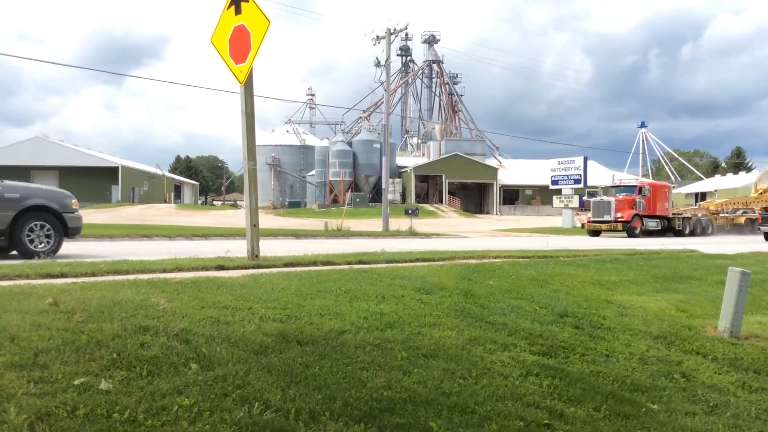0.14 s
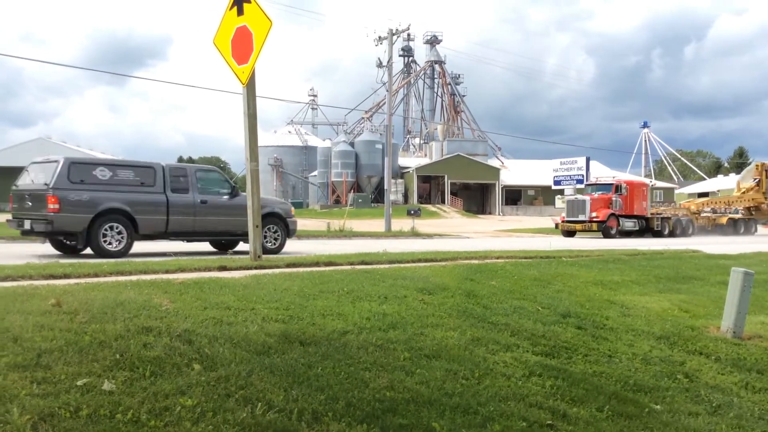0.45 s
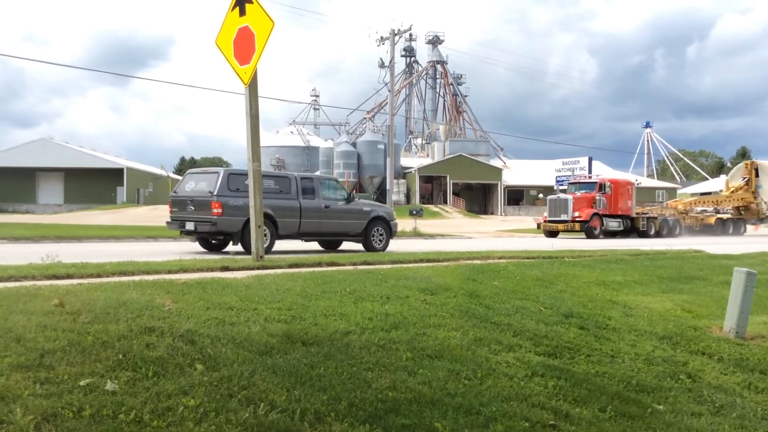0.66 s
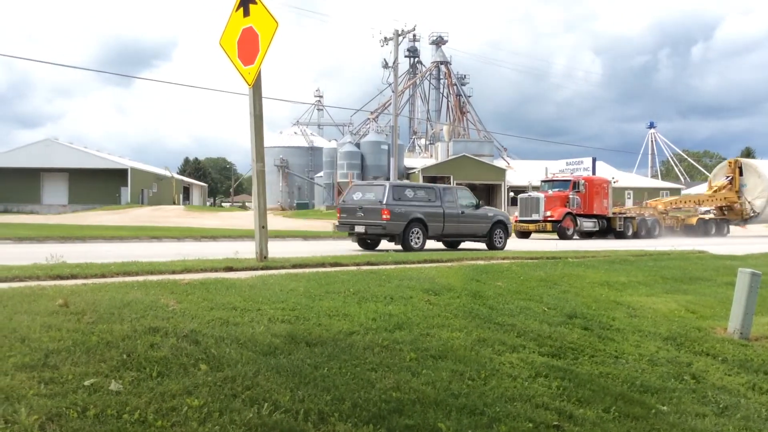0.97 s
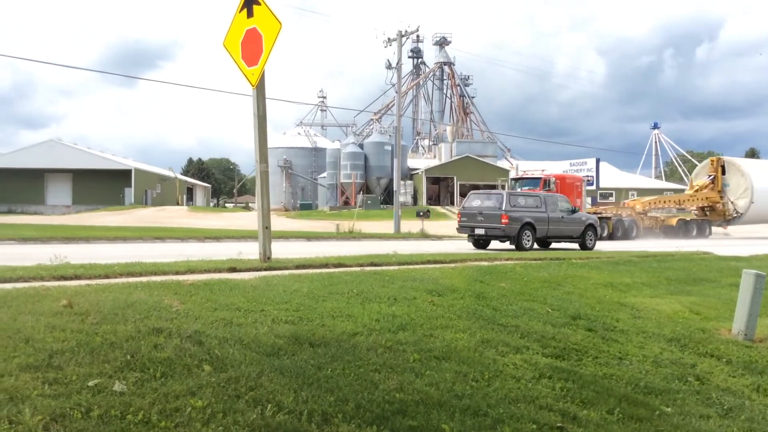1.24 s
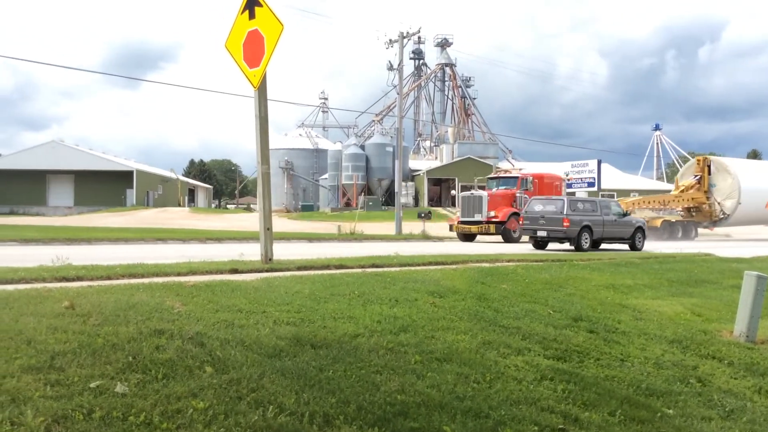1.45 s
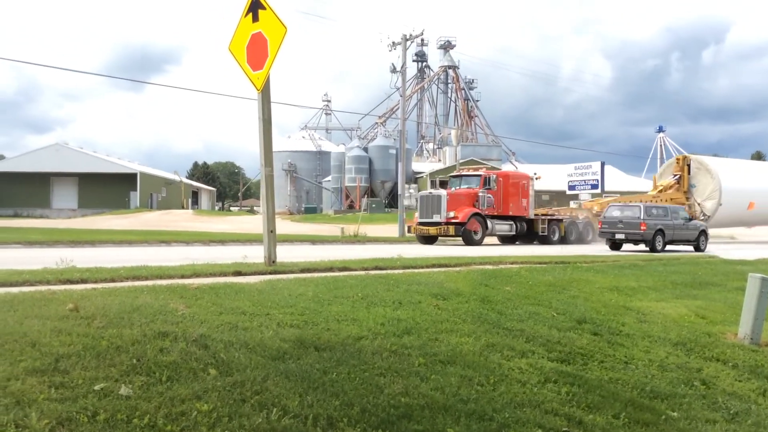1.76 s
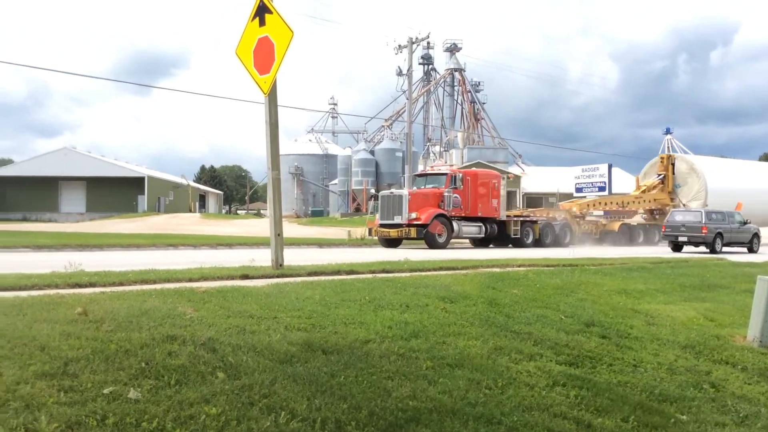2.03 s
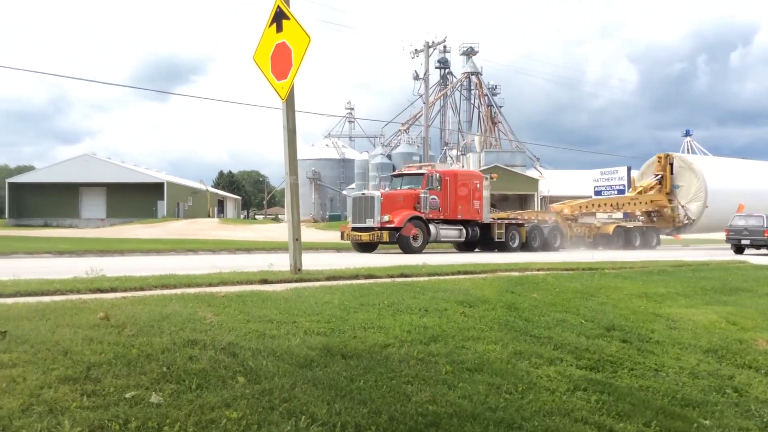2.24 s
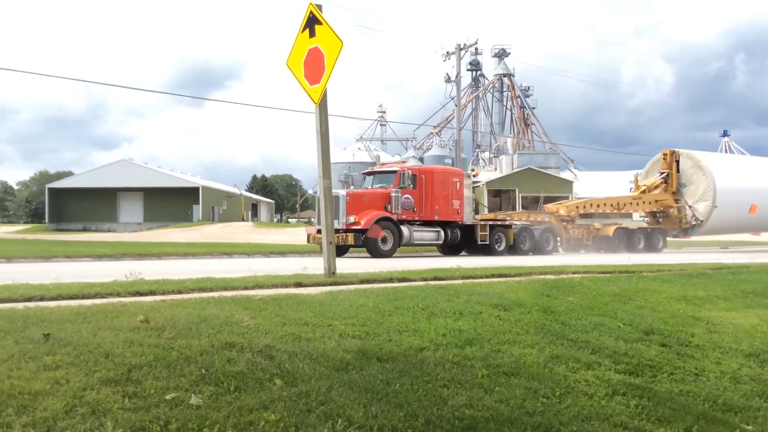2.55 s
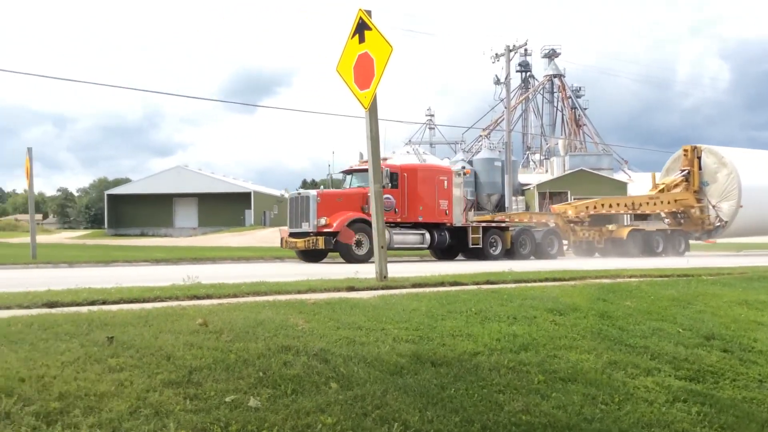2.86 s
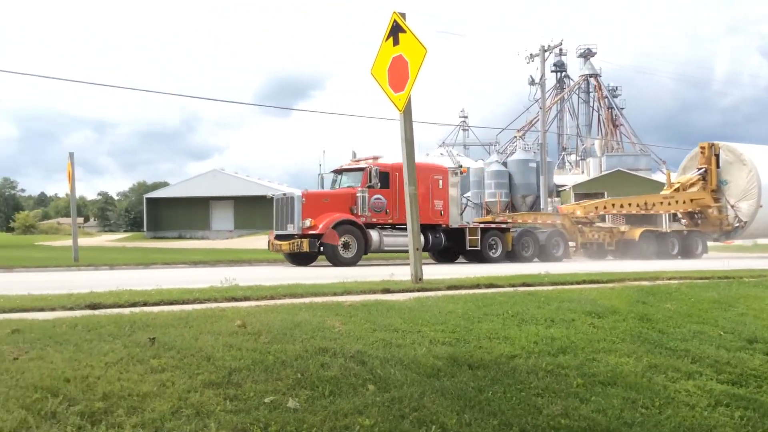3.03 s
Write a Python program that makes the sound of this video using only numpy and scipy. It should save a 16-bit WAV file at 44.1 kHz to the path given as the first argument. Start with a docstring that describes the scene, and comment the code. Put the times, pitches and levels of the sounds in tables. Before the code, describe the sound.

A heavy diesel truck approaches on an open road, its roar, low drone and hiss building under a climbing turbo whistle; a pickup whooshes past first, close by, while wind buffets the outdoor microphone.

```python
"""A pickup goes by at the start: noise for its tyres and rumble, and a hum that drops in pitch.
A heavy diesel truck comes closer: its roar, growl and hiss, made of coloured noise, run throughout and
are louder by the end. Its exhaust drones on low tones that drift slightly in pitch, a gear whines,
and two turbocharger whistles climb. Low noise and short pulses make the wind buffeting the microphone.
The sound is mono."""
import sys
import numpy as np
from scipy import signal
from scipy.fft import rfft, irfft, next_fast_len
from scipy.io import wavfile
from scipy.ndimage import uniform_filter1d, map_coordinates

SR = 44100
rng = np.random.default_rng(int(sys.argv[2]) if len(sys.argv) > 2 else 0)


def bounce(signal):
    """Save signal as a 16-bit WAV file at the path given by the first command-line argument."""
    frames = np.transpose(np.atleast_2d(signal))
    limited = np.clip(frames, -1, 1)
    pcm = np.round(limited * 32767).astype(np.int16)
    wavfile.write(sys.argv[1], SR, pcm)


N = 141120  # samples, 3.2 s
T = np.arange(N) / SR  # time of each sample, s


def amp(db):
    """Turn decibels into a gain."""
    return 10 ** (np.asarray(db) / 20)


def unit(x):
    """Scale a signal to an average strength (rms) of 1."""
    return x / np.sqrt(np.mean(x ** 2) + 1e-20)


def curves(rows):
    """Draw straight lines between the rows: one curve for each column after the time."""
    times, *columns = np.transpose(rows)
    return [np.interp(T, times, column) for column in columns]


def wobble(rate):
    """A smooth random curve through `rate` random points a second."""
    return map_coordinates(rng.standard_normal(4096), [T * rate + 2], mode="wrap")


def filtered(x, response):
    """Multiply each frequency of x by the gain that response(hz) gives."""
    length = next_fast_len(N + 8192)  # spare room so the end does not wrap onto the start
    hz = np.fft.rfftfreq(length, 1 / SR)
    return irfft(rfft(x, length) * response(hz), length)[:N]


def rush(spectrum, patchy_db):
    """Noise of rms 1, coloured by a spectrum, with random louder and softer patches."""
    grid = signal.stft(rng.standard_normal(N), nperseg=512)[2]
    # smooth random gains over frequency, then over time
    patches = uniform_filter1d(rng.standard_normal(grid.shape), size=6, axis=0)
    patches = uniform_filter1d(patches, size=12, axis=1)
    noise = signal.istft(grid * amp(patchy_db * unit(patches)), nperseg=512)[1][:N]
    points_hz, points_db = np.transpose(spectrum)

    def colour(hz):
        return amp(np.interp(np.log(hz + 1), np.log(points_hz), points_db))

    return unit(filtered(noise, colour))


def tone(hz, width_hz, rough):
    """A tone of rms 1 that follows a pitch; its rough share is smeared into a narrow band."""
    share = np.clip(rough, 0, 1)
    smear = wobble(2 * width_hz) + 1j * wobble(2 * width_hz)
    scatter = np.sqrt(1 - share) + np.sqrt(share / 2) * smear
    turns = np.cumsum(hz * np.ones(N)) / SR
    return unit(np.real(scatter * np.exp(2j * np.pi * turns)))


# Strength of the wind, before WIND_DB: (time [s], level [dB])
GUSTS = [(0.0, -46), (0.28, -35.5), (0.32, -57), (0.43, -33), (0.65, -46), (0.68, -46), (0.81, -61),
         (0.83, -45), (1.27, -36), (1.31, -67), (1.33, -46), (1.98, -42.5), (2.05, -35.5), (2.15, -47.5),
         (2.2, -35), (2.25, -44), (2.96, -40.5), (2.99, -37.5), (3.07, -40), (3.2, -50)]
# Colour of the buffeting: (frequency [Hz], relative level [dB])
BUFFET = [(15, -25), (30, -25), (42, -4), (60, 4.5), (85, -3.5), (120, -4), (200, -11), (330, -19.5),
          (600, -36), (1500, -65)]
# Short thumps of wind: (time [s], peak level [dB], length [s])
THUMPS = [(1.056, -26, 0.0022), (1.111, -28, 0.0023), (1.143, -32.5, 0.0012), (1.186, -27, .004),
          (2.984, -22, 0.0043)]
WIND_DB = -2  # added to the gust levels


def wind():
    """Moving air pushes on the microphone: low noise in gusts, plus short push-and-pull thumps."""
    gust_db, = curves(GUSTS)
    air = amp(gust_db + WIND_DB) * rush(BUFFET, patchy_db=1.0)
    for time, peak_db, length in THUMPS:
        u = (T - time) / length
        air = air + amp(peak_db) * (1 - 2 * u ** 2) * np.exp(-u ** 2)
    return air


# Colour of the pickup's tyre noise: (frequency [Hz], relative level [dB])
PICKUP_TYRES = [(300, -17), (380, 5), (470, -22), (580, -7), (720, -25), (850, -2), (1000, 7), (1220, -1.5),
                (1400, 7.5), (1600, -0.5), (2050, 1), (2400, -11), (3000, -11), (4000, -19), (5000, -26.5),
                (9000, -38)]
# Colour of the pickup's rumble: (frequency [Hz], relative level [dB])
PICKUP_RUMBLE = [(40, -35), (80, 10), (130, -0.5), (200, -3.5), (270, -1), (330, -5.5), (400, -13),
                 (480, -22), (900, -45)]
NEAREST_S, DISTANCE_M, SPEED_M_PER_S = 0.292, 12, 17  # moment and distance of the closest point
TYRES_DB, RUMBLE_DB, HUM_DB = -50.5, -42, -50.5  # levels at the closest point
HUM_HZ = 286.3  # before the Doppler shift


def pickup():
    """Sound fades with distance, and the Doppler effect drops the hum's pitch as the pickup passes."""
    metres = np.hypot(DISTANCE_M, SPEED_M_PER_S * (T - NEAREST_S))
    doppler = 1 - np.gradient(metres) * SR / 343  # speed of sound 343 m/s
    hum = amp(HUM_DB) * tone(HUM_HZ * doppler, width_hz=5.2, rough=0.18)
    tyres = amp(TYRES_DB) * rush(PICKUP_TYRES, patchy_db=1.5)
    rumble = amp(RUMBLE_DB) * rush(PICKUP_RUMBLE, patchy_db=2.5)
    return DISTANCE_M / metres * (hum + tyres + rumble)


# Colour of the truck's tyre roar: (frequency [Hz], relative level [dB])
AXLES = [(50, -9), (90, -9), (140, -3), (250, -5.5), (350, 6.5), (430, 0.5), (480, -5), (620, -11),
         (800, -8), (900, -10), (1020, 7), (1200, -8.5), (1400, -16), (1700, -18), (2300, -17),
         (3000, -15.5), (5500, -13), (9000, -9), (13000, -24.5), (15000, -45)]
AXLES_DB, AXLES_RISE_DB_PER_S, AXLES_ABREAST_S = -42.5, 22.5, 2.72  # AXLES_DB once alongside


def axles():
    """The truck's tyre roar swells until its axles come alongside, then holds."""
    level_db = AXLES_DB + AXLES_RISE_DB_PER_S * np.minimum(T - AXLES_ABREAST_S, 0)
    return amp(level_db) * rush(AXLES, patchy_db=1.6)


# Low exhaust tones: (multiple of the drone pitch [ratio], relative level [dB])
DRONE = [(1, 1.5), (1.5, -2.5), (3, -6), (4, -6.5), (6, -13.5)]
# Colour of the exhaust rumble: (frequency [Hz], relative level [dB])
EXHAUST = [(50, -8), (80, 0.5), (125, -3), (165, 0), (215, 0), (260, -3), (310, -15.5), (400, -17),
           (500, -43), (1000, -70)]
# Loudness of the gear whine: (time [s], level [dB])
GEAR = [(0, -86), (1.4, -74.5), (1.9, -60), (2.6, -52), (3.2, -54.5)]
DRONE_HZ, GEAR_HZ = 54.5, 525  # the drone drifts slightly around its pitch
DRONE_DB, EXHAUST_DB = -51.5, -44.5  # levels halfway through
EXHAUST_GROWS_DB_PER_S = 1.5


def drivetrain():
    """Exhaust tones drift in pitch together over a rumble, both growing; a gear whines."""
    drone_hz = DRONE_HZ * (1 + 0.0081 * wobble(4.01))
    drone = sum(amp(db) * tone(multiple * drone_hz, width_hz=4, rough=0.23) for multiple, db in DRONE)
    exhaust = amp(DRONE_DB) * drone + amp(EXHAUST_DB) * rush(EXHAUST, patchy_db=1.5)
    growth = amp(EXHAUST_GROWS_DB_PER_S * (T - T.mean()))
    gear_db, = curves(GEAR)
    gear = amp(gear_db) * tone(GEAR_HZ, width_hz=6, rough=0.089)
    return growth * exhaust + gear


# Pitch of the main turbocharger whistle: (time [s], frequency [Hz])
TURBO = [(0, 5880), (.5, 6170), (1, 6520), (1.4, 6870), (1.8, 7410), (2.07, 7830), (2.3, 8080), (2.6, 8420),
         (2.9, 8700), (3.2, 9020)]
# Loudness of both whistles: (time [s], main level [dB], upper level before flicker [dB])
WHISTLE = [(0, -67, -59), (.45, -64, -59), (.62, -56, -69), (.88, -63, -68), (1.06, -69, -62),
           (1.25, -63, -66), (1.62, -59, -67), (2.05, -51.5, -73), (2.4, -50.5, -69), (2.8, -46, -65),
           (3.2, -43, -68)]
UPPER_RATIO = 11 / 7  # upper pitch over main pitch
WHISTLE_WIDTH_HZ, WHISTLE_ROUGH = 36, .8
UPPER_WIDTH_HZ, UPPER_FLICKER_DB = 140, 1


def turbo():
    """Two blade tones of one shaft rise together as it spools up, fluttering in the turbulent air."""
    main_hz, = curves(TURBO)
    main_db, upper_db = curves(WHISTLE)
    main = amp(main_db) * tone(main_hz, WHISTLE_WIDTH_HZ, WHISTLE_ROUGH)
    flicker_db = UPPER_FLICKER_DB * wobble(8.14)
    upper = amp(upper_db + flicker_db) * tone(UPPER_RATIO * main_hz, UPPER_WIDTH_HZ, rough=0.68)
    return main + upper


# The truck's loudness, before the trims below:
# (time [s], roar level [dB], growl level [dB], hiss and rasp level [dB])
TRUCK = [(0.0, -48, -55, -50), (0.04, -44, -53, -49), (0.07, -51, -55, -49), (0.2, -42.5, -46, -47.5),
         (0.22, -48, -44.5, -47), (0.41, -51.5, -49.5, -49), (0.44, -49.5, -47, -49),
         (1.1, -50, -53, -49.5), (1.14, -43.5, -49.5, -49), (1.24, -55, -51.5, -50.5),
         (1.42, -54, -52.5, -52), (1.66, -45.5, -46.5, -47), (2.16, -44.5, -42.5, -45.5),
         (2.31, -44, -44, -47), (3.13, -45, -45, -44), (3.2, -41, -48, -45)]
# Colour of the engine roar: (frequency [Hz], relative level [dB])
ROAR = [(300, -25), (400, -11), (470, -16.5), (540, -3), (590, -0.5), (650, -3), (700, -10), (780, -13),
        (900, -29), (1200, -55), (3000, -68)]
# Colour of the growl: (frequency [Hz], relative level [dB])
GROWL = [(500, -30), (880, -13), (980, -4), (1100, -2.5), (1210, -3.5), (1370, 3.5), (1560, -8), (1710, -2),
         (1850, -10), (2100, -8.5), (2280, -22.5), (2700, -31.5), (4000, -40)]
# Colour of the bright mechanical rasp: (frequency [Hz], relative level [dB])
RASP = [(900, 0.5), (1700, -1.5), (2100, 2), (2500, 3.5), (3500, 3), (4700, -7), (6500, 3.5), (9000, -45)]
# Colour of the air hiss: (frequency [Hz], relative level [dB])
HISS = [(2000, -23), (4000, -8), (6500, -10.5), (7600, -3), (8400, -2.5), (9300, -5), (10200, -12.5),
        (11500, -17), (13400, -21), (14300, -37), (15200, -41)]
ROAR_DB, GROWL_DB, RASP_DB, HISS_DB = -1, -2, -3.5, 1  # trims added to the table's levels
HISS_FLUTTER_DB = 0.63


def truck():
    """Engine, mechanical and air noise in four bands, with dips and swells, louder by the end."""
    roar_db, growl_db, hiss_db = curves(TRUCK)
    roar = amp(roar_db + ROAR_DB) * rush(ROAR, patchy_db=1.14)
    growl = amp(growl_db + GROWL_DB) * rush(GROWL, patchy_db=1.43)
    rasp = amp(hiss_db + RASP_DB) * rush(RASP, patchy_db=1)
    flutter_db = HISS_FLUTTER_DB * wobble(30.1)
    hiss = amp(hiss_db + HISS_DB + flutter_db) * rush(HISS, patchy_db=0.86)
    return roar + growl + rasp + hiss


def scene():
    """Add up all the sources and send the same sound to both channels."""
    mono = wind() + pickup() + axles() + drivetrain() + turbo() + truck()
    return np.array([mono, mono])


LOW_CUT_HZ, TOP_HZ = 31, 15200


def record(dry):
    """Roll off the deepest bass and remove everything from the top limit upward."""
    def band(hz):
        return (hz < TOP_HZ) * hz ** 3 / np.sqrt(hz ** 6 + LOW_CUT_HZ ** 6)

    return np.array([filtered(x, band) for x in dry])


dry = scene()
out = record(dry)
bounce(out)
```